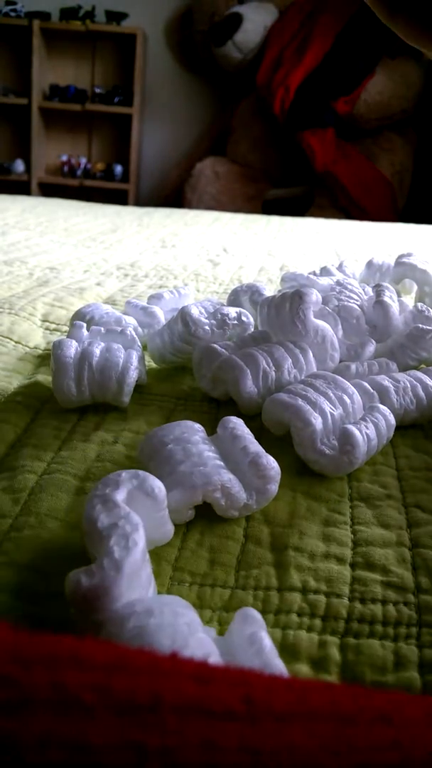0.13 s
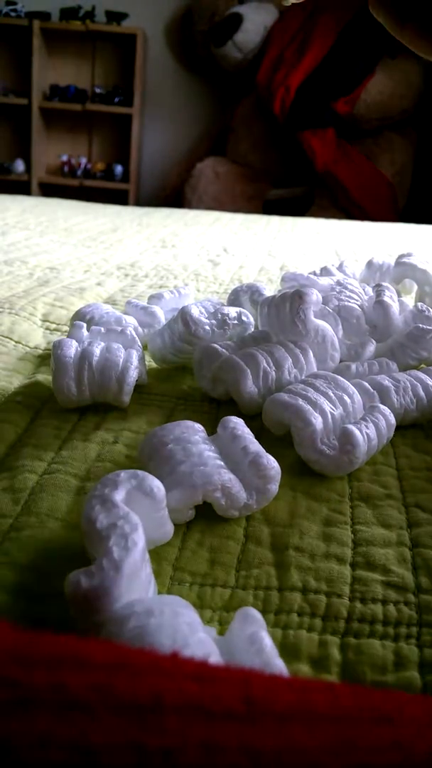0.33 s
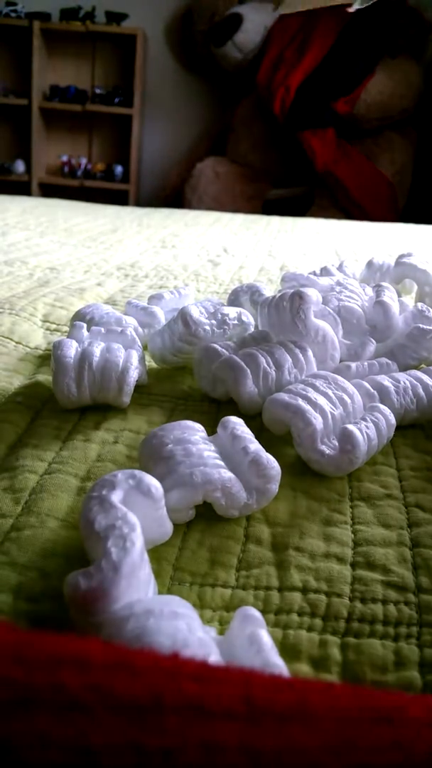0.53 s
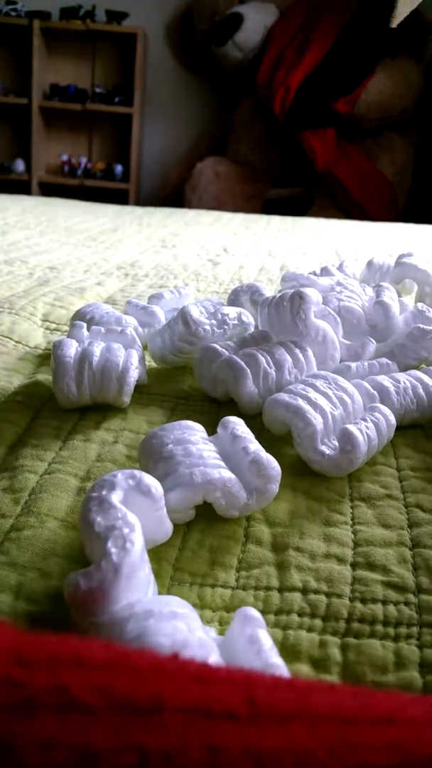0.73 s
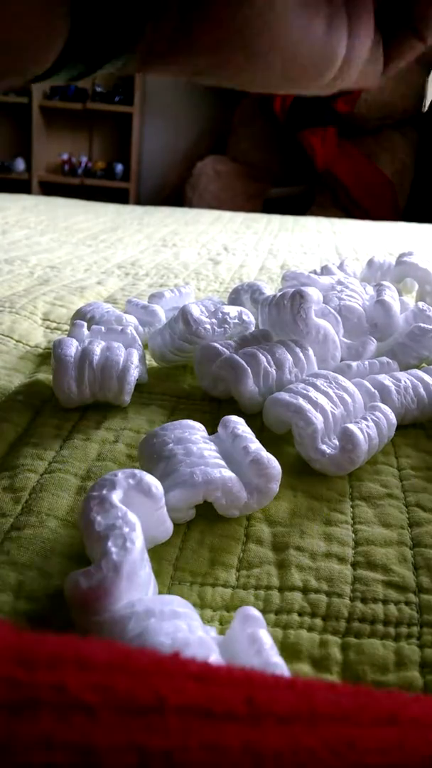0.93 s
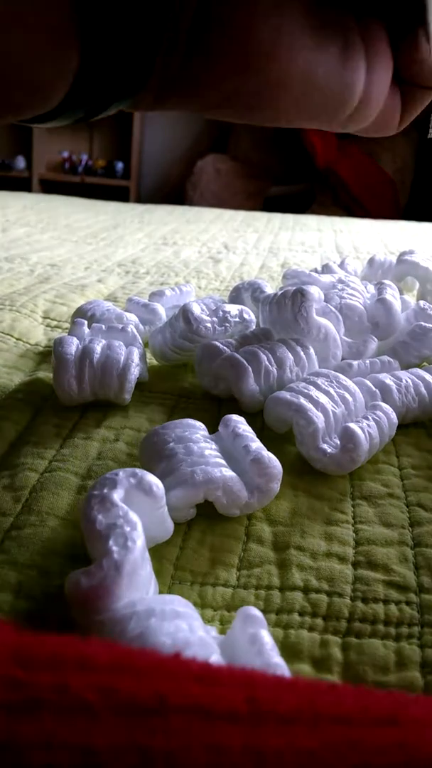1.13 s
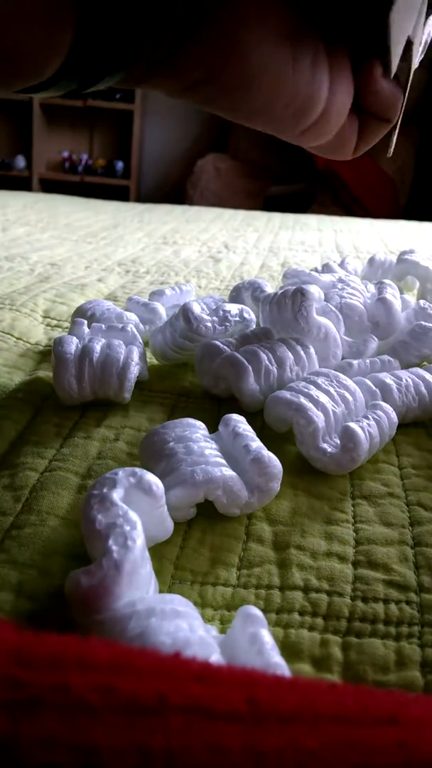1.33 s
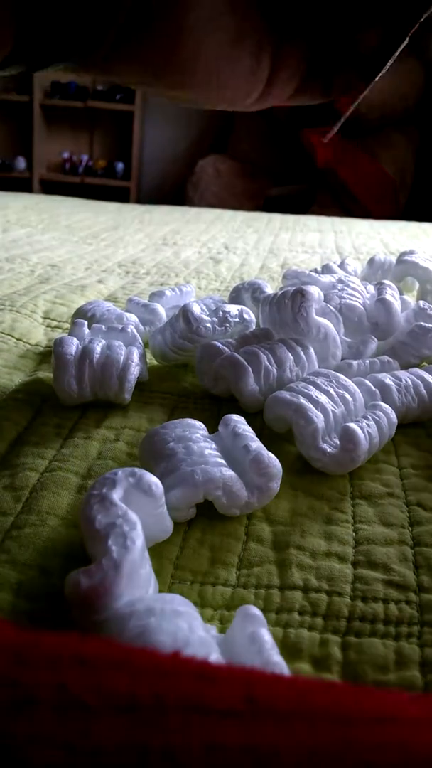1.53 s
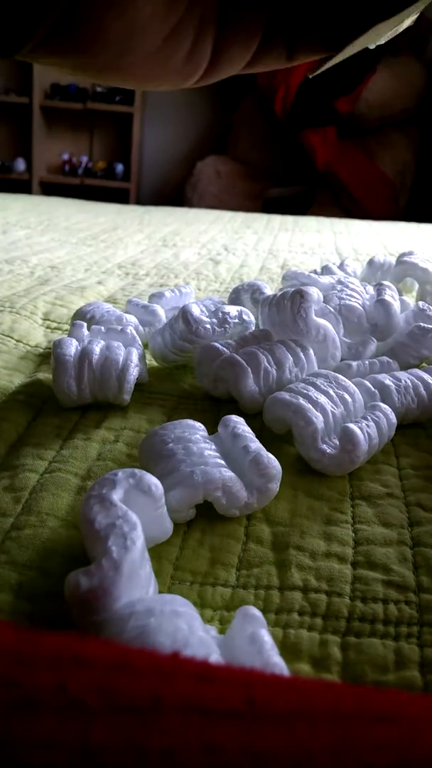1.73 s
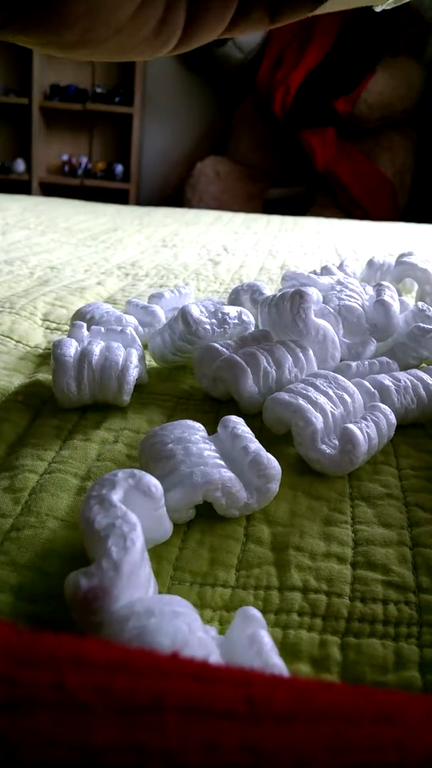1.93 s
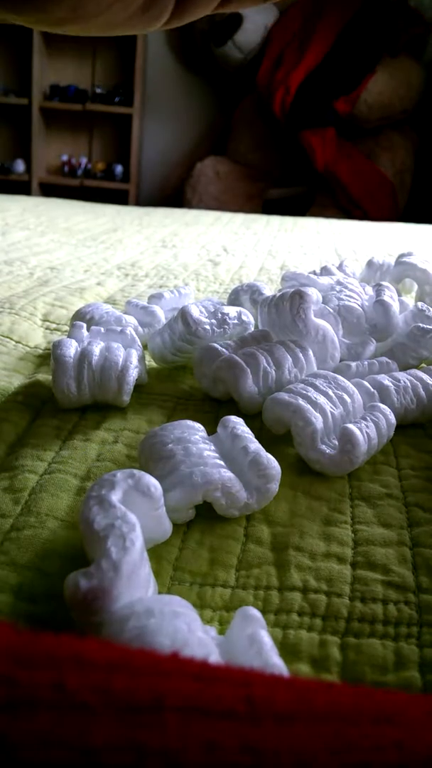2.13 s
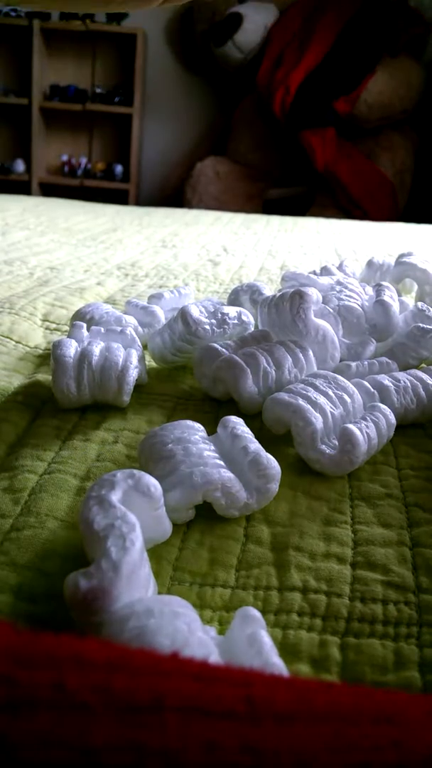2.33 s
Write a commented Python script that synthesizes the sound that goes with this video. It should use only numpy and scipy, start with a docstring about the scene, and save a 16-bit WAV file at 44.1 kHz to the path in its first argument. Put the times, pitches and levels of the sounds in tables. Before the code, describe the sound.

Foam packing peanuts rustled by a hand on a quilt, crackling, squeaking and softly bumping, close up

```python
"""Crackles and swishes: a hand sweeps through loose foam packing peanuts on a quilt, heard close in wide stereo.
Foam sounds are dense random slip clicks, shaped by swells and spectra; squeezed peanuts ring as damped modes
and rubbed ones as noise-driven resonances. Soft bumps are damped low sines. A slow drag then dies away.
Under it lie the low rumble and mains hum of a small room: coloured noise and a sine."""
import sys
import numpy as np
from scipy import signal
from scipy.fft import rfft, irfft
from scipy.io import wavfile

SR = 44100
rng = np.random.default_rng(int(sys.argv[2]) if len(sys.argv) > 2 else 0)


def file_out(sig):
    """Save sig as 16-bit WAV at sys.argv[1]."""
    # one column per channel
    cols = np.atleast_2d(sig).T
    # limit, then scale
    lim = np.clip(cols, -1, 1)
    pcm = np.round(lim * 32767).astype(np.int16)
    wavfile.write(sys.argv[1], SR, pcm)


N = 108045
T = np.arange(N) / SR  # s
HZ = np.fft.rfftfreq(N, 1 / SR)


def amp(db):
    """Decibels to gain."""
    return 10 ** (np.asarray(db) / 20)


def unit(x):
    """Scales to an rms of one."""
    return x / np.sqrt(np.mean(x ** 2) + 1e-20)


def read(points):
    """Interpolates (freq_hz, value) points on a log frequency axis."""
    freq_hz, value = np.transpose(points)
    return np.interp(np.log(HZ + 1), np.log(freq_hz + 1), value)


def colour(x, points, tilt_db_per_octave=0):
    """Filters by a spectrum, tilted above 250 Hz, at unit power gain for white input."""
    octaves = np.log2(np.maximum(HZ, 250))
    gain = unit(amp(read(points) + tilt_db_per_octave * octaves))
    return irfft(rfft(x) * gain, N)


def swell(peak_s, rise_s, fall_s):
    """A bell-shaped envelope with its own rise and fall."""
    width_s = np.where(T < peak_s, rise_s, fall_s)
    return np.exp(-((T - peak_s) / width_s) ** 2)


def slow_noise(scale_s):
    """Low-passed noise of unit rms: a random drift on the given time scale."""
    spectrum = rfft(rng.standard_normal(N))
    return unit(irfft(spectrum / (1 + (HZ * scale_s) ** 2), N))


def slips(clump_db):
    """Dense stick-slip clicks of random size and sign that come in clumps, as two channels of unrelated clicks."""
    slips_per_s, spread_db, clump_s = 16000, 3.5, 0.0013
    size = amp(spread_db * np.minimum(rng.exponential(1, (2, N)), 4))
    sign = rng.choice([-1, 1], (2, N))
    clicks = size * sign * (rng.random((2, N)) < slips_per_s / SR)
    return unit(clicks * amp(clump_db * slow_noise(clump_s)))


def room(x, wet_db, t60_s):
    """Adds a short tail of sparse, decaying reflections, from 4 ms on."""
    reflections_per_s = 2000
    t = T[:SR // 3]
    taps = rng.standard_normal((2, len(t))) * (rng.random((2, len(t))) < reflections_per_s / SR)
    taps *= amp(-60 * t / t60_s) * (t > .004)
    tail = taps / np.linalg.norm(taps, axis=1, keepdims=True)
    return x + amp(wet_db) * signal.fftconvolve(x, tail, axes=1)[:, :N]


def background():
    """Steady room rumble is coloured noise; the mains hum is one sine, added alike to both channels."""
    rumble_db, hum_hz, hum_db = -38.5, 121.14, -47.5
    # rumble spectrum: freq_hz, relative density_db
    rumble_spectrum = [(20, -16), (36, -19), (52, 1), (68, -12.5), (100, -6.5), (160, -5.5), (210, -4.5),
                       (260, -3.5), (340, 4.5), (460, -6), (600, -9), (740, -12), (930, -16), (1200, -24.5),
                       (2000, -30), (3600, -43.5), (7000, -38), (15400, -31)]
    rumble = amp(rumble_db) * colour(rng.standard_normal((2, N)), rumble_spectrum)
    hum = amp(hum_db) * np.sqrt(2) * np.sin(2 * np.pi * (hum_hz * T + rng.random()))
    return rumble + hum


def knock(start_s, pitch_hz):
    """A cushioned knock: a soft rise, then quickly damped low cycles and a quieter overtone that fades with
    them."""
    rise_s, cycles_to_60_db_down = 0.0024, 8.25
    overtone_ratio, overtone_db = 2.27, -7.5
    t = np.maximum(T - start_s, 0)
    phase = 2 * np.pi * pitch_hz * t
    fade = amp(-60 * pitch_hz * t / cycles_to_60_db_down)
    rise = 1 - np.exp(-(t / rise_s) ** 2)
    overtone = amp(overtone_db) * fade * np.sin(overtone_ratio * phase)
    return rise * fade * (np.sin(phase) + overtone)


def bumps():
    """Each soft knock sounds in the two channels with its own balance and lag."""
    # soft bumps: start_s, level_db, pitch_hz, right_minus_left_db, right_lag_s
    bump_rows = [(0.0932, -18.5, 267, -6, 0.0007), (.501, -17.5, 296, -4, 0.00074),
                 (0.514, -30, 95, 1.5, .002), (0.5377, -15, 287, -8, 0.00071),
                 (.650, -16, 343, -7, 0.00063), (.701, -20.5, 398, 3.5, 0.00058),
                 (.726, -17.5, 383, -1, .0007), (0.78, -12, 333, 5, 0.0012),
                 (0.974, -11, 260, -12, 0.00084), (0.9842, -17, 190, -1, 0.0014),
                 (0.9948, -17, 200, -3, 0.00058), (1.031, -32, 83, 0, 0.0022),
                 (1.319, -22.5, 117, -1, 0.0016), (1.342, -25, 273, -4, 0.0013),
                 (1.344, -31, 79, -4, 0.0015), (1.483, -29.5, 85, -1.5, 0.0018),
                 (1.489, -15, 302, -4.5, .0008), (1.676, -36, 404, -5, 0.00096),
                 (1.747, -12, 364, 4, 0.00084), (1.977, -14, 340, 1, 0.00088),
                 (2.1785, -13, 319, -7, 0.00082)]
    out = np.zeros((2, N))
    for start_s, level_db, pitch_hz, right_db, lag_s in bump_rows:
        left = knock(start_s, pitch_hz)
        right = amp(right_db) * knock(start_s + lag_s, pitch_hz)
        out += amp(level_db) * np.array([left, right])
    return out


def scuffs():
    """Peanuts pushed over the quilt make a dull, lumpy rustle of strongly clumped slips."""
    # scuffs of foam on cloth: peak_s, rise_s, fall_s, level_db, tilt_db_per_octave
    scuff_rows = [(0.106, 0.0088, 0.016, -42.5, 5), (0.221, 0.053, 0.055, -36.5, 3.5),
                  (0.44, 0.01, 0.014, -34, 4.5), (0.502, .012, 0.044, -32, 2),
                  (.725, 0.037, 0.022, -32.5, 2), (0.874, 0.015, 0.025, -31.5, 6),
                  (0.978, 0.014, 0.03, -30, -9), (1.04, 0.082, 0.08, -30.5, 1),
                  (1.27, 0.042, 0.1, -42.5, 1.5), (1.322, 0.0059, 0.044, -32.5, 5),
                  (1.332, 0.04, 0.0052, -36, 8), (1.41, 0.11, 0.055, -41.5, 3.5),
                  (1.55, 0.071, 0.39, -41.5, 2), (1.647, 0.006, 0.019, -34, 6),
                  (1.679, 0.0035, 0.018, -29.5, 0.5), (1.77, 0.011, 0.049, -46, 1.5),
                  (1.871, 0.025, 0.015, -40.5, 5), (1.984, 0.0058, 0.03, -40.5, 5),
                  (2.18, 0.0069, 0.014, -36, 2.5), (2.32, 0.015, 0.021, -48, 7)]
    # scuff spectrum: freq_hz, relative density_db
    scuff_spectrum = [(50, -20), (130, -20), (220, 1.5), (350, 4), (600, -1), (740, -8), (930, -4.5),
                      (1170, -21.5), (1500, -18), (2100, -31.5), (4000, -34), (15000, -51)]
    grain = slips(clump_db=3.0)
    return sum(amp(level_db) * colour(grain * swell(peak_s, rise_s, fall_s), scuff_spectrum, tilt)
               for peak_s, rise_s, fall_s, level_db, tilt in scuff_rows)


def drag():
    """A slow slide of lightly clumped slips whose level follows a curve and dies away."""
    # drag level curve: time_s, level_db
    drag_curve = [(1.12, -48), (1.2, -43.5), (1.29, -38), (1.36, -38), (1.405, -34), (1.429, -40),
                  (1.52, -37.5), (1.6, -40.5), (1.78, -44), (1.82, -47), (1.98, -46), (2.08, -55),
                  (2.2, -55.5), (2.31, -53.5), (2.345, -51.5), (2.37, -60.5)]
    # slide spectrum: freq_hz, relative density_db
    slide_spectrum = [(400, 4.5), (1500, 0.5), (2100, -14), (3600, 4.5), (5200, -6.5), (6500, -0.5),
                      (8000, -0.5), (10000, -2), (12500, 0.5), (15400, -0.5)]
    time_s, level_db = np.transpose(drag_curve)
    return colour(slips(clump_db=1.0) * amp(np.interp(T, time_s, level_db)), slide_spectrum)


def crackles():
    """A peanut catches and lets go in a short burst of slips."""
    # crackles of single peanuts: peak_s, half_length_s, level_db
    crackle_rows = [(.010, 0.00096, -30), (0.037, 0.0012, -26), (0.098, .0012, -36.5), (0.211, 0.0019, -25),
                    (0.434, 0.0033, -30.5), (0.444, 0.0017, -23), (0.452, 0.005, -33), (0.655, .002, -41),
                    (0.669, 0.0026, -38), (0.837, 0.018, -33.5), (0.869, 0.0039, -28), (1.089, 0.0018, -29),
                    (1.098, 0.001, -15.5), (1.112, 0.0025, -21.5), (1.24, 0.0023, -31),
                    (1.311, 0.0035, -22.5), (1.317, 0.0016, -18), (1.329, 0.0034, -26.5),
                    (1.334, 0.0015, -26), (1.406, 0.0014, -27.5), (1.475, 0.0016, -29.5),
                    (1.481, 0.003, -29), (1.483, 0.0012, -44), (1.646, 0.0023, -33), (1.704, 0.0015, -31.5),
                    (1.712, .001, -33.5), (1.733, 0.0016, -33), (1.755, 0.0023, -36), (1.76, .001, -37),
                    (1.783, 0.0088, -38.5), (1.791, 0.0011, -39), (2.176, 0.0022, -46), (2.419, .001, -47)]
    # snap spectrum: freq_hz, relative density_db
    snap_spectrum = [(500, -12), (2000, -31.5), (3600, -0.5), (5200, 1.5), (8000, 2), (9500, 3.5),
                     (11500, 5), (13000, 3.5), (15400, 0.5)]
    bursts = sum(amp(level_db) * swell(peak_s, half_s, half_s) for peak_s, half_s, level_db in crackle_rows)
    return colour(bursts * slips(clump_db=0), snap_spectrum)


def pops():
    """A squeezed peanut pops hollowly: a few quick slips set its damped modes ringing."""
    # pops of squeezed peanuts: start_s, level_db, pitch_hz
    pop_rows = [(.093, -34, 637), (.65, -32, 617), (.7, -31.5, 844), (.722, -36, 820), (.98, -27, 522),
                (1.311, -20, 3500), (1.3148, -20, 3750), (1.321, -26, 1480), (1.323, -27, 910),
                (1.326, -34, 3650), (1.33, -21.5, 920), (1.336, -26, 3420), (1.477, -15, 3560),
                (1.478, -36, 2700), (1.4792, -13, 4130), (1.481, -23, 5030), (1.559, -36, 1340),
                (1.644, -24, 1680), (1.646, -23, 2640), (1.659, -27, 1000), (1.658, -45, 2640),
                (1.675, -27.5, 794), (1.676, -36, 1730), (1.691, -32, 835), (1.748, -28, 607),
                (1.978, -37, 1670), (1.977, -31, 730), (2.178, -36, 590)]
    # modes of a peanut: pitch_ratio, level_db, cycles of the pitch until 60 dB down
    mode_rows = [(.6, -28, 1), (0.999, -2.5, 27.5), (1.5, -6, 17)]
    slip_decay_s, slips_per_s = .002, 8000
    out, t = np.zeros((2, N)), T[:SR // 20]
    for start_s, level_db, pitch_hz in pop_rows:
        hits = rng.standard_normal(len(t)) * (rng.random(len(t)) < slips_per_s / SR)
        drive = hits * np.exp(-t / slip_decay_s)
        for ratio, mode_db, cycles in mode_rows:
            mode = amp(-60 * pitch_hz * t / cycles) * np.exp(2j * np.pi * pitch_hz * ratio * t)
            ring = signal.fftconvolve(drive, mode)[:len(t)]
            # same energy as the plain mode, whatever the slips drawn
            ring *= amp(level_db + mode_db) * np.linalg.norm(mode) / np.linalg.norm(ring)
            out[:, round(start_s * SR):][:, :len(t)] += [ring.imag, ring.real]
    return out


def rasps():
    """Friction noise drives the resonance of one peanut, whose pitch wanders as the pressure on it changes."""
    # rasps of rubbed peanuts: peak_s, half_length_s, level_db, pitch_hz, width_hz (of each of two poles)
    rasp_rows = [(.15, 0.028, -53, 7340, 350), (0.227, .025, -40, 11400, 500),
                 (0.31, 0.038, -54.5, 5400, 400), (0.446, 0.0095, -33, 8800, 353),
                 (.447, .01, -37, 12800, 300), (0.674, .012, -48, 9300, 350),
                 (0.877, 0.035, -37.5, 3640, 200), (0.946, 0.018, -65, 2700, 250),
                 (1.025, 0.028, -30, 8980, 400), (1.068, 0.036, -29, 6620, 260),
                 (1.09, 0.038, -31.5, 5440, 450), (1.649, 0.0075, -31, 2580, 130),
                 (1.9, 0.073, -53.5, 3460, 350)]
    wander_share, wander_s = .009, .012  # rms share of the pitch, time scale
    out = 0
    for peak_s, half_s, level_db, pitch_hz, width_hz in rasp_rows:
        wandering_hz = pitch_hz * (1 + wander_share * slow_noise(wander_s))
        carrier = np.exp(2j * np.pi * np.cumsum(wandering_hz) / SR)
        pole = np.exp(-np.pi * width_hz / SR)
        ring = signal.lfilter([1], [1, -2 * pole, pole * pole], rng.standard_normal((2, N)))
        out = out + amp(level_db) * swell(peak_s, half_s, half_s) * unit((ring * carrier).real)
    return out


def sweeps():
    """Foam rubbing on foam swishes with each move of the hand, and ripples with the short ring of the heap."""
    # sweeps of the hand: peak_s, rise_s, fall_s, level_db, tilt_db_per_octave
    sweep_rows = [(.02, 0.074, 0.037, -39.5, -4), (.155, 0.043, 0.041, -36.5, -2),
                  (0.224, 0.021, 0.031, -27, 4), (.3, 0.036, 0.042, -35, 1.5),
                  (.40, 0.045, 0.08, -47.5, -3), (.5, 0.025, 0.038, -37.5, -0.5),
                  (.59, 0.024, 0.025, -45.5, 0), (.68, 0.013, 0.022, -47, 7),
                  (.73, 0.021, 0.015, -40.5, -2), (.785, 0.018, 0.01, -47.5, -8),
                  (0.87, 0.044, 0.029, -29, 0), (0.949, 0.043, 0.03, -30, -3.5),
                  (.981, 0.0097, 0.056, -24, 0), (1.045, 0.041, 0.047, -18, 2),
                  (1.13, 0.069, 0.038, -31, -1.5)]
    # swish spectrum: freq_hz, relative density_db
    swish_spectrum = [(300, -22), (1200, -14), (2000, -14), (2600, -13), (3000, -11), (3600, -4),
                      (4300, -5), (5200, -3), (6100, -4), (6600, 0), (7900, -8), (8900, 1), (10200, -3),
                      (12200, -4), (12900, -1), (14000, -4), (15400, -3)]
    grain = unit(room(slips(clump_db=1.45), wet_db=-8, t60_s=0.043))
    return sum(amp(level_db) * colour(grain * swell(peak_s, rise_s, fall_s), swish_spectrum, tilt)
               for peak_s, rise_s, fall_s, level_db, tilt in sweep_rows)


def widen(x):
    """Makes a wide stereo pair: the right is a delayed, phase-shifted, rebalanced mix of the two inputs."""
    # share of the first input in the right channel: freq_hz, likeness (0-1)
    likeness_points = [(50, .2), (160, .97), (450, .95), (620, .2), (900, .93), (1150, .2), (1400, .95),
                       (1700, .85), (2000, .4), (2200, 1), (5500, 1), (6200, .4), (8000, .92), (9000, .9),
                       (11000, .6), (15000, .1)]
    # level balance: freq_hz, left_minus_right_db
    balance_points = [(50, 2), (120, -1.5), (300, 5), (480, 5.5), (640, 10), (950, 2), (1130, 5), (1400, 4),
                      (2000, 0), (5400, 0), (8000, 2.5), (11000, 6.5), (15400, 11)]
    # phase shift besides the delay: freq_hz, left_lead_rad
    lead_points = [(50, 1.1), (120, 1.3), (480, .6), (700, -1.1), (1100, -1.4), (1250, -2.9), (1700, -2),
                   (2450, -2.52), (15000, -2.52)]
    delay_s = .000368
    left, other = rfft(x)
    same = np.clip(read(likeness_points), 0, 1)
    lag = np.exp(-1j * (read(lead_points) + 2 * np.pi * HZ * delay_s))
    mixed = same * left + np.sqrt(1 - same ** 2) * other
    right = mixed * lag / amp(read(balance_points))
    return irfft(np.array([left, right]), N)


def scene():
    """The foam in the room and the background, widened together; the bumps have their own stereo placing."""
    dry_foam = sweeps() + rasps() + drag() + scuffs() + crackles() + pops()
    foam = room(dry_foam, wet_db=-15.5, t60_s=0.062)
    return widen(foam + background()) + room(bumps(), wet_db=-10, t60_s=0.063)


def record(dry):
    """The recorder's band limit: a steep linear-phase low-pass."""
    edge_hz = 15650
    low_pass = signal.firwin(511, edge_hz, window=("kaiser", 9), fs=SR)
    return signal.oaconvolve(dry, low_pass[None], "same")


dry = scene()
out = record(dry)
file_out(out)
```